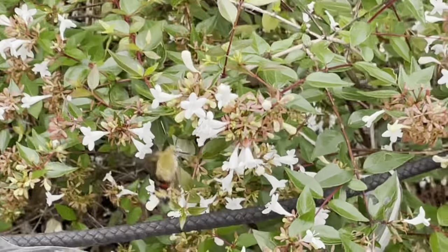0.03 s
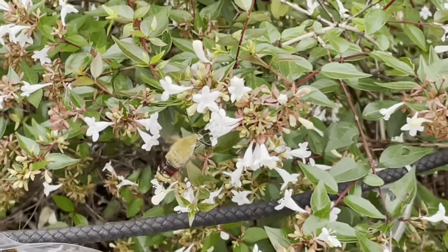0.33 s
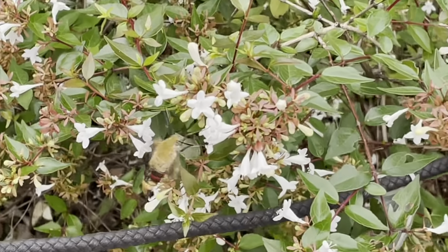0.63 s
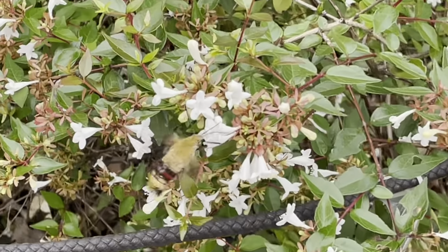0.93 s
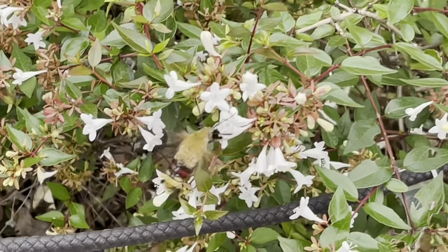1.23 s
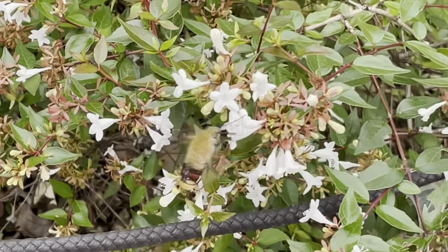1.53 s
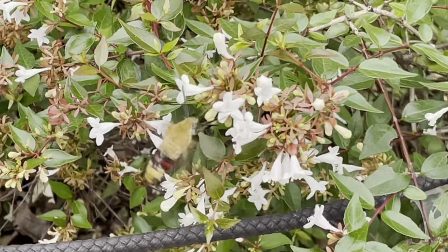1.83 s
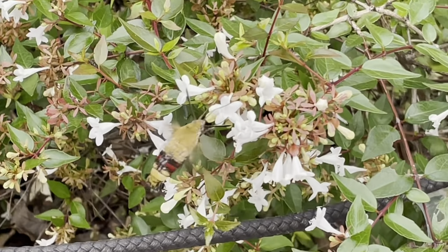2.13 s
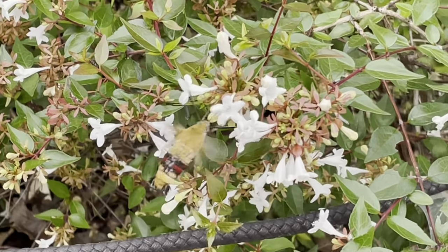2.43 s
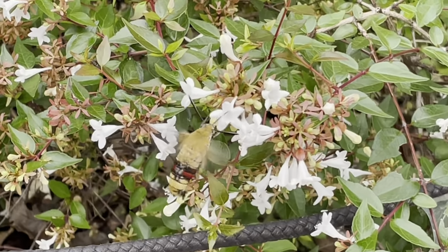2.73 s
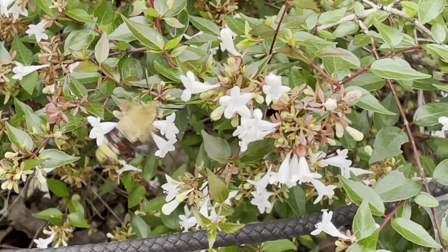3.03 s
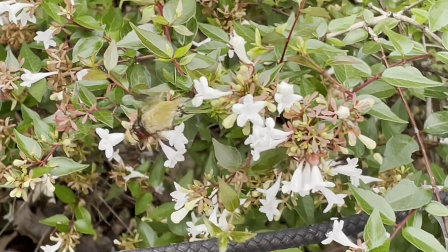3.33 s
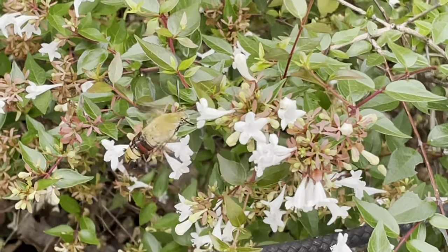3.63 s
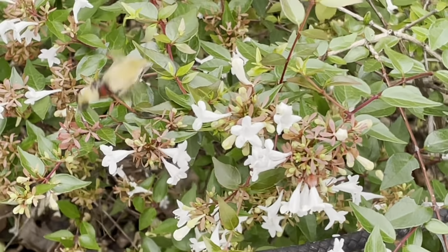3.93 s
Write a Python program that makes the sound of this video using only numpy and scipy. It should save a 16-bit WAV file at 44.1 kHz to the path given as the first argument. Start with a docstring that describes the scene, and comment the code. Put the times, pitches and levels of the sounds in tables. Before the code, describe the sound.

A low, quiet drone of faraway traffic continues outdoors, with soft swells and faint tyre whine over a thin high hiss. Close to the microphone come small handling scuffs and squeaks, and three short leaf rustles in the first half or so.

```python
"""A garden, beside a shrub, with a hand-held camera. Distant traffic roars and rumbles with brief low
swells, tyres whine faintly, and one engine climbs in pitch as its firing rate rises. A thin high hiss,
probably far insects, comes from the left. Close by, the hand scuffs the camera's case and squeaks on
it by stick-slip friction. Leaves slide over each other and rustle three times."""
import sys
import numpy as np
from scipy import signal
from scipy.fft import rfft, irfft
from scipy.io import wavfile

SR = 44100
rng = np.random.default_rng(int(sys.argv[2]) if len(sys.argv) > 2 else 0)


def log_audio(samples):
    """Write samples as a 16-bit WAV file to the path given in sys.argv[1]."""
    # one column per channel
    frames = np.atleast_2d(samples).T
    # limit to full scale, then quantise
    limited = np.clip(frames, -1, 1)
    pcm = np.round(limited * 32767).astype(np.int16)
    wavfile.write(sys.argv[1], SR, pcm)


N = 176400
T = np.arange(N) / SR
FREQ = np.maximum(np.arange(N // 2 + 1) * SR / N, 1)


def undb(db):
    """Decibels to amplitude ratio."""
    return 10 ** (np.asarray(db) / 20)


def unit(x):
    """Normalisation to rms 1."""
    return x / np.sqrt(np.mean(x ** 2))


def curve(rows, column=1):
    """Linear interpolation of one table column over time."""
    rows = np.array(rows)
    return np.interp(T, rows[:, 0], rows[:, column])


def colour(points):
    """Gain interpolated over log frequency from (frequency_hz, gain_db) points."""
    hz, db = np.array(points).T
    return undb(np.interp(np.log(FREQ), np.log(hz), db))


def shaped(x, gain):
    """Filtering by multiplication of the spectrum."""
    return irfft(rfft(x) * gain, N)


def noise(gain):
    """Filtered Gaussian noise of rms 1."""
    return unit(shaped(rng.standard_normal(N), gain))


def resonance(hz, width_hz):
    """Lorentzian peak: the gain halves at width_hz either side of hz."""
    return 1 / (1 + ((FREQ - hz) / width_hz) ** 2)


def walk(rate_hz):
    """Random modulation: noise of rms 1, low-passed at rate_hz."""
    return noise(1 / (1 + (FREQ / rate_hz) ** 4))


def swell(middle_s, half_length_s):
    """Gaussian envelope: a smooth rise and fall."""
    return np.exp(-.5 * ((T - middle_s) / half_length_s) ** 2)


def stereo(mid, side):
    """Sum and difference give left and right."""
    return np.array([mid + side, mid - side])


def diffuse(gain):
    """Scattered sound: independent noise in each channel."""
    return np.array([noise(gain), noise(gain)])


def from_left(x, lag_s=0.000177):
    """Arrival-time difference: frequencies above 1 / lag_s reach the right channel later."""
    turns = np.maximum(FREQ * lag_s, 1)
    return np.array([x, shaped(x, np.exp(-2j * np.pi * turns))])


# Spectrum of the traffic rumble: frequency_hz, gain_db
RUMBLE_SPECTRUM = [(20, -24), (35, -5.5), (52, -1), (76, 2.5), (98, -6), (135, -6), (180, -4), (215, -11.5),
                   (330, -23.5), (700, -91.5)]
# Envelope of the rumble: time_s, level_db
RUMBLE_ENVELOPE = [(0.1, -42), (0.6, -42), (1.05, -42), (1.45, -39.5), (1.7, -42.3), (2.3, -41),
                   (2.55, -42), (2.9, -41), (3.25, -40.5), (3.8, -42.5)]


def rumble(side_db=-24.5):
    """Incoherent summation: many far engines merge into a low drone, almost alike in both ears."""
    gain = colour(RUMBLE_SPECTRUM)
    pair = stereo(noise(gain), undb(side_db) * noise(gain))
    return pair * undb(curve(RUMBLE_ENVELOPE))


# Brief low swells in the rumble: middle_s, pitch_hz, level_db
RUMBLE_SWELLS = [(0.79, 77.6, -40), (0.9, 80, -38), (1.21, 80.4, -37), (1.335, 71.5, -34.5),
                 (1.455, 81.6, -42.5), (1.84, 65.5, -43), (2.145, 53, -40.5), (2.57, 80.2, -36),
                 (3.32, 86, -41.5), (3.97, 62, -37)]


def rumble_swells(half_length_s=0.016):
    """Gaussian tone bursts: the low rumble swells briefly, a few cycles at a time."""
    out = 0
    for middle_s, pitch_hz, level_db in RUMBLE_SWELLS:
        phase = 2 * np.pi * pitch_hz * T + rng.uniform(0, 2 * np.pi)
        out = out + unit(np.sin(phase)) * undb(level_db) * swell(middle_s, half_length_s)
    return out


# Spectrum of the tyre roar: frequency_hz, gain_db
ROAR_SPECTRUM = [(120, 0.5), (240, -5), (300, -0.5), (345, -2.5), (420, 1.5), (540, -1), (710, -8.5),
                 (920, -4.5), (1100, -9), (1300, -8), (1650, -13), (1950, -12.5), (2800, -16.5),
                 (4000, -22), (7000, -73), (15000, -92)]
# Envelope of the roar: time_s, level_db
ROAR_ENVELOPE = [(0.1, -49.5), (0.27, -50.5), (0.56, -50), (0.73, -48.5), (0.98, -49), (1.1, -47),
                 (1.35, -47), (1.6, -48), (2.3, -48), (2.8, -47.5), (4.0, -47.5)]
# Scattered share of the roar: frequency_hz, side_minus_mid_db
ROAR_SCATTER = [(150, -9.5), (300, -2.5), (500, -9), (720, 0.5), (950, -6), (1800, -1.5), (2600, -9),
                (4000, -19)]
# Balance of the roar: frequency_hz, left_minus_right_db
ROAR_BALANCE = [(150, -9.5), (300, 6.5), (600, 2.5), (1000, 5.5), (2000, 3), (4000, -0.5)]


def tyre_roar(flicker_db=0.6):
    """Scattering by the surroundings widens the tyre noise; its midrange leans left."""
    gain = colour(ROAR_SPECTRUM)
    pair = stereo(noise(gain), shaped(noise(gain), colour(ROAR_SCATTER)))
    lean = np.sqrt(colour(ROAR_BALANCE))
    envelope = undb(curve(ROAR_ENVELOPE) + flicker_db * walk(22.6))
    return shaped(pair, np.array([lean, 1 / lean])) * envelope


# Hums and whines of far vehicles: middle_s, half_length_s, pitch_hz, wander_hz, level_db
VEHICLE_TONES = [(0.366, .065, 114.5, 2.2, -43), (1.02, 0.45, 76, 5.76, -50.5),
                 (1.877, 0.1, 62, 2.17, -42.5), (1.985, 0.077, 127, 1.97, -47.5),
                 (2.8, .07, 130, 2.04, -49.5), (3.4, 0.18, 134, 3.2, -46.5), (3.9, 0.099, 128, 3.4, -48.5),
                 (2.8, 0.46, 406, 4.86, -59.5), (3.69, 0.53, 466, 2.97, -56.5), (3, 0.65, 942, 11.9, -63)]


def whines(flutter_db=2.5):
    """Random frequency and amplitude modulation: engine and tyre tones waver as they swell and fade."""
    out = 0
    for middle_s, half_length_s, pitch_hz, wander_hz, level_db in VEHICLE_TONES:
        phase = 2 * np.pi * np.cumsum(pitch_hz + wander_hz * walk(15)) / SR
        envelope = undb(level_db + flutter_db * walk(8)) * swell(middle_s, half_length_s)
        out = out + unit(np.sin(phase)) * envelope
    return out


# One far engine pulling away: time_s, firing_hz, level_db
ENGINE_RUN = [(0.3, 81.9, -67), (0.46, 89.4, -53), (0.6, 98.5, -44.5), (0.76, 113.1, -44),
              (0.9, 117.1, -40), (1.03, 120.5, -49), (1.25, 124.1, -39.5), (1.4, 123.4, -45),
              (1.55, 123.3, -49), (1.8, 126, -57)]


def engine(wander=0.012, flutter_db=1.5, octave_db=-20):
    """Periodic firing: a fundamental and a weak second harmonic climb with the engine's speed."""
    firing_hz = curve(ENGINE_RUN) * (1 + wander * walk(17))
    phase = 2 * np.pi * np.cumsum(firing_hz) / SR
    tone = unit(np.sin(phase) + undb(octave_db) * np.sin(2 * phase))
    return tone * undb(curve(ENGINE_RUN, column=2) + flutter_db * walk(14))


# Spectrum of the high hiss: frequency_hz, gain_db
HISS_SPECTRUM = [(2500, -23), (3800, -4), (4600, 5.5), (5500, 6), (6200, 3.5), (7000, 0), (8200, -12),
                 (9500, -4.5), (11300, -9), (13000, -9), (15500, -9)]
# Envelope of the hiss: time_s, level_db
HISS_ENVELOPE = [(0.1, -60.5), (0.5, -62.5), (0.95, -63), (1.5, -62), (2.4, -61), (3.0, -60), (4.0, -59)]
# Thin ringing tones within the hiss: pitch_hz, relative_level_db
HISS_TONES = [(4559, -19), (4827, -26), (4960, -23.5), (5079, -20), (5161, -18), (5489, -14), (5872, -21),
              (5934, -27), (6045, -22.5), (6101, -19), (6643, -23)]


def hiss(tone_width_hz=6.2, flicker_db=0.5, scatter_db=-19):
    """Superposition of broad and narrow noise bands: a steady hiss like a far insect chorus."""
    gain = colour(HISS_SPECTRUM)
    tones = sum(undb(db) * noise(resonance(hz, tone_width_hz)) for hz, db in HISS_TONES)
    chorus = (noise(gain) + tones) * undb(flicker_db * walk(40))
    pair = from_left(chorus) + undb(scatter_db) * diffuse(gain)
    return pair * undb(curve(HISS_ENVELOPE))


# Resonances of the camera case: frequency_hz, width_hz, gain_db
CASE_MODES = [(1020, 94, 6), (1520, 140, 6), (1940, 140, 8), (2060, 110, -1), (2540, 120, -24)]
# Scuffs of the hand on the case: start_s, decay_s, level_db
HAND_SCUFFS = [(0.103, 0.008, -51), (1.07, 0.029, -57), (1.115, 0.025, -53.5), (1.305, 0.049, -53),
               (2.076, 0.027, -55.5), (3.82, 0.011, -49.5)]


def scuffs(attack_s=0.003, side_db=-7):
    """Forced vibration: friction of sliding skin briefly drives the resonances of the camera case."""
    gain = sum(undb(db) * resonance(hz, width_hz) for hz, width_hz, db in CASE_MODES)
    envelope = 0
    for start_s, decay_s, level_db in HAND_SCUFFS:
        age_s = T - start_s
        rise = np.clip(1 + age_s / attack_s, 0, 1)  # complete at start_s
        decay = np.exp(-np.maximum(age_s, 0) / decay_s)
        envelope = envelope + undb(level_db) * rise * decay
    return envelope * stereo(noise(gain), undb(side_db) * noise(gain))


# Tiny squeaks of the slipping grip: middle_s, half_length_s, pitch_hz, level_db
GRIP_SQUEAKS = [(0.1065, 0.0011, 2034, -46), (0.114, 0.0043, 1620, -49.5), (2.052, 0.0135, 3490, -58)]


def squeaks(sag=0.082, roughness_hz=170, grain_db=2):
    """Stick-slip friction: the grip catches and lets go in a rough tone that sags as it eases."""
    out = 0
    for middle_s, half_length_s, pitch_hz, level_db in GRIP_SQUEAKS:
        glide_hz = pitch_hz * (1 - sag * np.tanh((T - middle_s) / half_length_s))
        phase = 2 * np.pi * np.cumsum(glide_hz + roughness_hz * walk(720)) / SR
        envelope = undb(level_db + grain_db * walk(370)) * swell(middle_s, half_length_s)
        out = out + unit(np.sin(phase)) * envelope
    return out


# Spectrum of leaf rubbing on leaf: frequency_hz, gain_db
LEAF_SPECTRUM = [(500, -1), (1900, 8.5), (3500, -3), (5500, 6), (8000, 3), (11000, 0), (15000, -3)]
# Leaf contacts, merging into three rustles: middle_s, half_length_s, level_db, tilt_db_per_octave
LEAF_CONTACTS = [(1.212, 0.032, -58, -2.5), (1.248, 0.015, -55.5, 0), (1.893, 0.023, -62, 2),
                 (2.072, 0.022, -58, 4), (2.084, .03, -50.5, -2.2)]


def rustles(grain_db=0.8, scatter_db=-8, edge_steepness=2.8):
    """Sliding friction: leaves rub over each other in short, grainy bursts of broadband noise."""
    out = 0
    for middle_s, half_length_s, level_db, tilt_db_per_octave in LEAF_CONTACTS:
        gain = colour(LEAF_SPECTRUM) * undb(tilt_db_per_octave * np.log2(FREQ))
        pair = from_left(noise(gain)) + undb(scatter_db) * diffuse(gain)
        contact = np.exp(-.5 * np.abs((T - middle_s) / half_length_s) ** edge_steepness)
        out = out + pair * undb(level_db + grain_db * walk(280)) * contact
    return out


def scene(left_minus_right_db=2.15):
    """Superposition of all sources; a level difference sets the traffic slightly to the left."""
    lean = undb(np.array([[left_minus_right_db], [-left_minus_right_db]]) / 2)
    traffic = rumble() + engine() + whines() + rumble_swells()
    return lean * traffic + tyre_roar() + hiss() + rustles() + scuffs() + squeaks()


# Stereo width of the camera, nearly mono in the lower treble: frequency_hz, side_gain_db
STEREO_WIDTH = [(2500, -3), (3100, -4.5), (3600, -46), (5600, -33), (6100, -23), (6400, 0), (15000, -2.5)]


def record(dry, fade_start_s=0.035, fade_end_s=0.097, cutoff_hz=14250):
    """Mid-side and low-pass filtering: the camera narrows the lower treble, fades in and cuts the top."""
    left, right = dry
    mid, side = (left + right) / 2, (left - right) / 2
    pair = stereo(mid, shaped(side, colour(STEREO_WIDTH)))
    fade = np.clip((T - fade_start_s) / (fade_end_s - fade_start_s), 0, 1) ** 1.19
    low_pass = signal.ellip(10, .2, 80, cutoff_hz, fs=SR, output="sos")
    return signal.sosfilt(low_pass, pair * fade)


dry = scene()
out = record(dry)
log_audio(out)
```